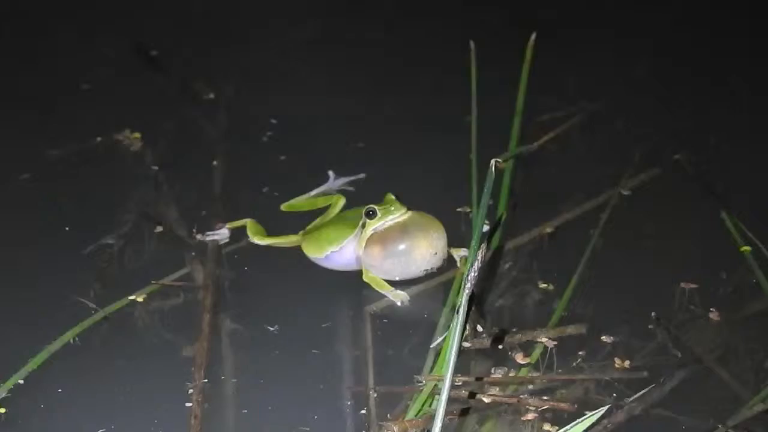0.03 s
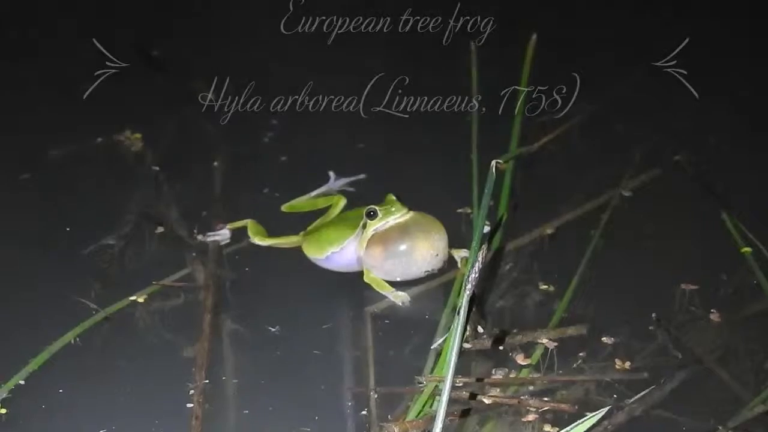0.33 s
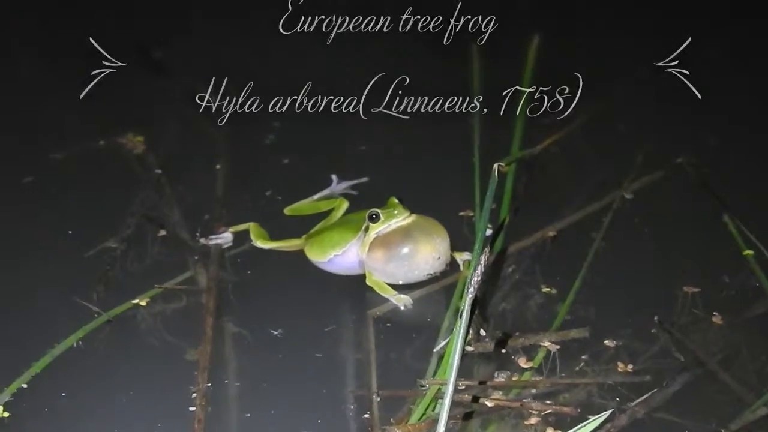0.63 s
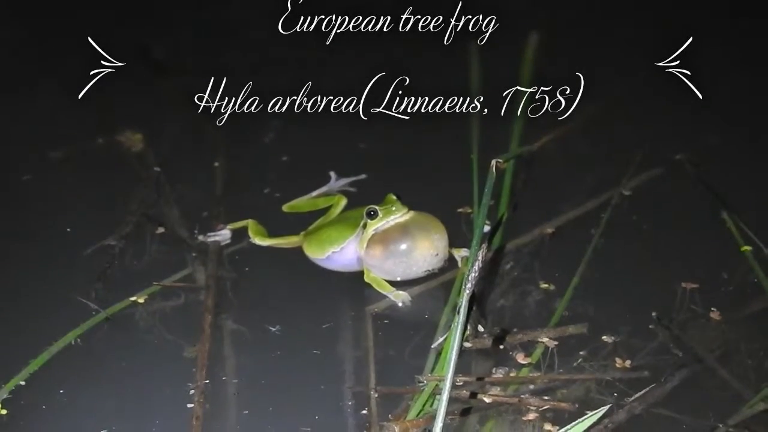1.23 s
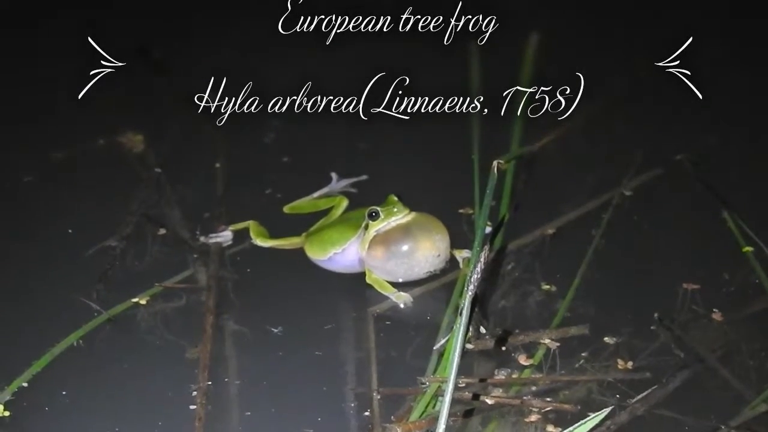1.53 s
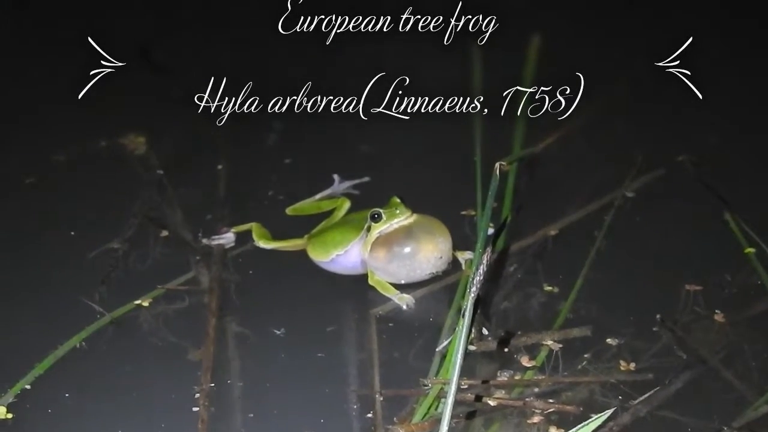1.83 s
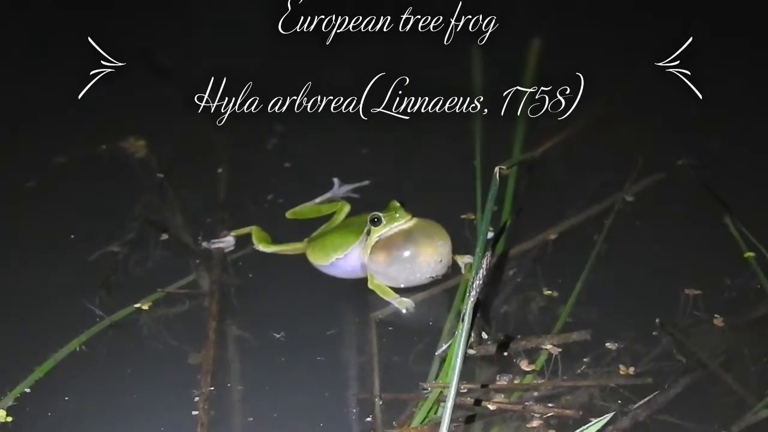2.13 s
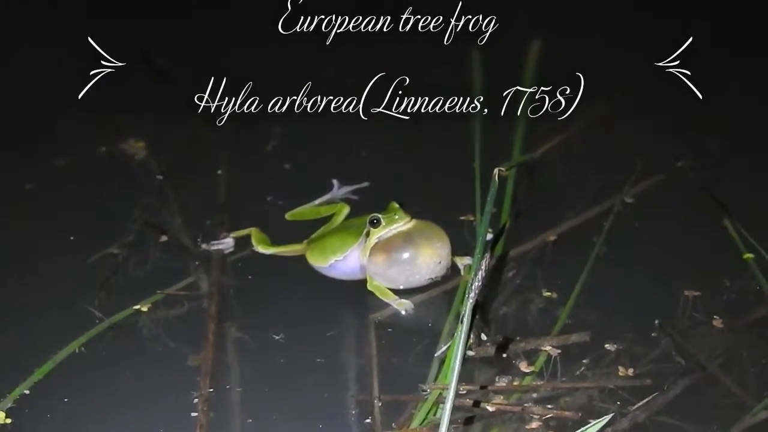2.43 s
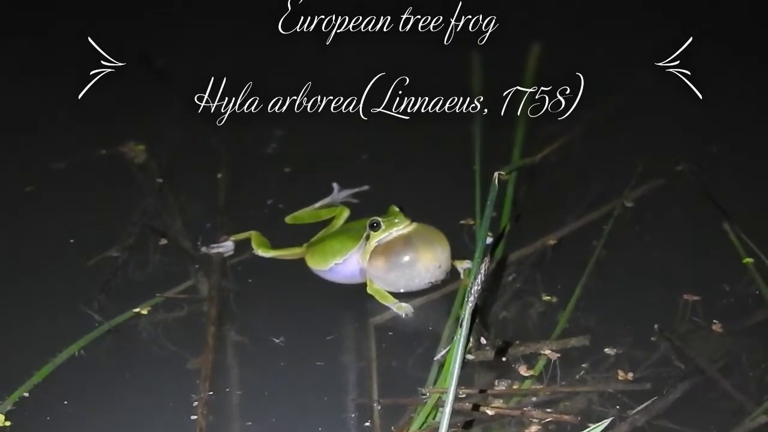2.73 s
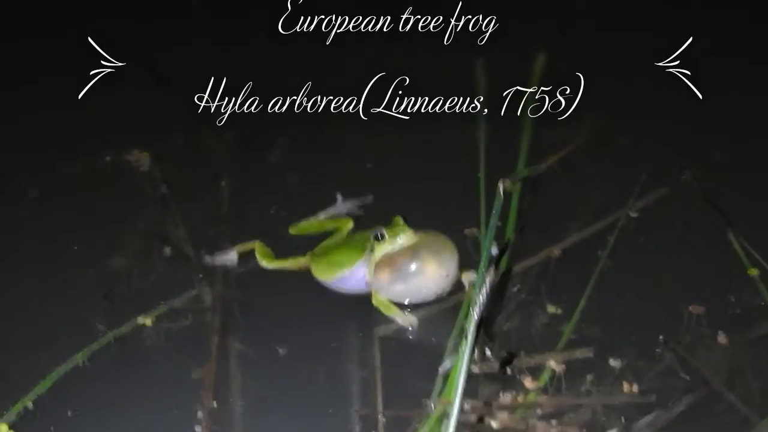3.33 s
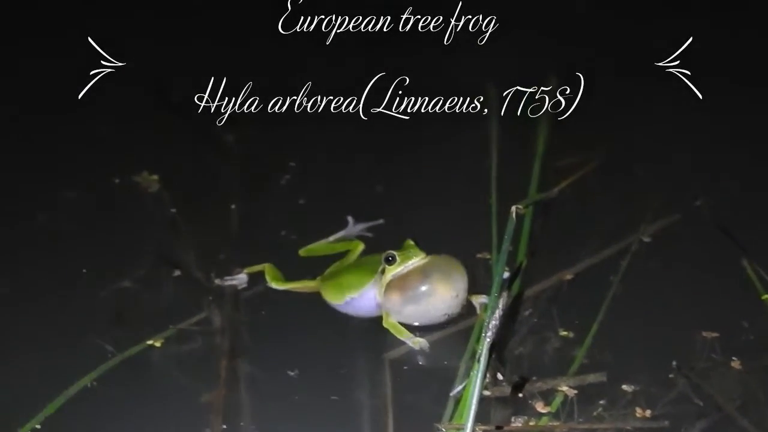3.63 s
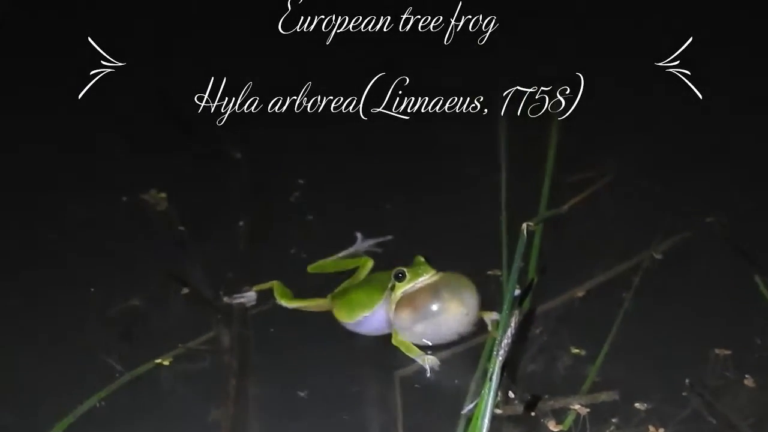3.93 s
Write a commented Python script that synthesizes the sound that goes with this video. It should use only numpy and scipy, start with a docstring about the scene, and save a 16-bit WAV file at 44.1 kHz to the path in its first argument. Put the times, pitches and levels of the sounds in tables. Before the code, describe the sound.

Tree frogs croak rapidly at a night pond, a close one joining near the end.

```python
"""Tree frogs at a night pond. Each croak is a quick run of pulses ringing the vocal sac, rising in pitch.
Neighbours on the left take turns with swelling croaks over a far chorus; near the end a close frog joins,
loud enough to crackle the microphone. Reeds and banks scatter the calls. Soft hoots and thin chirps come
from far away, and two soft bumps and a faint drone sound in the night air."""
import sys
import numpy as np
from scipy import signal
from scipy.fft import rfft, irfft
from scipy.io import wavfile
from scipy.ndimage import uniform_filter1d, minimum_filter1d

SR = 44100
rng = np.random.default_rng(int(sys.argv[2]) if len(sys.argv) > 2 else 0)


def pcm_store(signal):
    """Save signal as 16-bit PCM."""
    levels = np.round(np.clip(np.atleast_2d(signal), -1, 1) * 32767)
    wavfile.write(sys.argv[1], SR, levels.astype(np.int16).T)


N = 176400
T = np.arange(N) / SR

JITTER_S = .00015   # pulse timing, all frogs
# Pulse of the neighbours and the far chorus.
PULSE_S = (.0017, .0008, .0013)   # attack, hold, decay
RASP_DB = -26.5
# Its rasp spectrum. Each row: frequency in Hz, relative level in dB.
RASP_SPECTRUM = [(950, -3.5), (1600, 3.5), (3000, -3.5), (4500, -14), (7000, -29), (8500, -34),
                 (16000, -35)]


def from_db(db):
    """Decibels to gain."""
    return 10 ** (np.asarray(db) / 20)


def add(out, s, x):
    """Mix x into out from time s on."""
    i = int(round(s * SR))
    a, b = max(i, 0), min(i + x.shape[-1], N)
    if b > a:
        out[..., a:b] += x[..., a - i:b - i]


def at_hz(points, hz):
    """Read a table on a log-frequency axis."""
    knots_hz, values = np.transpose(points)
    return np.interp(np.log(hz + 1), np.log(knots_hz), values)


def ramp(x):
    """Smooth step from 0 to 1."""
    return np.sin(np.pi / 2 * np.clip(x, 0, 1)) ** 2


def noise(spectrum):
    """Stereo noise of rms 1, coloured by rows of Hz, dB."""
    # Stereo likeness. Each row: frequency in Hz, left-right correlation.
    likeness = [(30, 0.55), (400, 0.63), (2500, 0.21), (12000, 0.26)]
    hz = np.arange(N // 2 + 1) * SR / N
    mid, side = rfft(rng.standard_normal((2, N))) * from_db(at_hz(spectrum, hz))
    alike = at_hz(likeness, hz)
    x = irfft(np.sqrt(1 + alike) * mid + np.sqrt(1 - alike) * side * [[1], [-1]], N)
    return x / x.std()


def tones(rows, attack_s, release_s, sag_hz_per_s=0, waver=0):
    """Soft, nearly pure notes; optional pitch sag and level waver."""
    out = np.zeros(N)
    for s, length_s, hz, db in rows:
        t = T[:int(length_s * SR)]
        unsteady = 1 + waver * np.interp(t, np.linspace(0, 1, 40), rng.standard_normal(40))
        envelope = ramp(t / attack_s) * ramp((length_s - t) / release_s) * unsteady
        add(out, s, from_db(db) * envelope * np.sin(2 * np.pi * (hz - sag_hz_per_s * t / 2) * t))
    return out


def night_air(level_db=-45.5):
    """Air and the farthest calls, blurred into steady noise."""
    # Each row: frequency in Hz, relative level in dB.
    air_spectrum = [(25, -28.5), (65, -0.5), (180, 2.5), (300, -17.5), (420, -3.5), (620, -8.5), (950, 8.5),
                    (1600, -4.5), (2200, 0), (3000, -8), (4500, -9), (6500, -17.5), (9000, -22.5),
                    (16000, -35.5)]
    return from_db(level_db) * noise(air_spectrum)


def bumps_and_drone():
    """Two soft low bumps and a faint drone."""
    # Each row: start in seconds, length in seconds, pitch in Hz, gain in dB.
    low_notes = [(1.75, 0.055, 202, -36), (2.06, 0.59, 152.3, -50.5), (2.26, 0.059, 227, -37.5)]
    return tones(low_notes, attack_s=.06, release_s=.042, waver=.1)


def thin_chirps(period_s=.055, length_s=.038):
    """Something small, far away: runs of falling chirps."""
    # Each row: start in seconds, chirp count, starting pitch in Hz, level in dB.
    runs = [(0.378, 3, 4600, -50.5), (.81, 3, 4230, -52.5), (0.951, 4, 4520, -50), (1.613, 4, 4630, -49.5),
            (2.03, 4, 4310, -57), (2.226, 4, 4600, -49), (2.569, 6, 4320, -59), (2.954, 3, 4630, -48)]
    chirps = [(s + period_s * k, length_s, hz, db) for s, count, hz, db in runs for k in range(count)]
    return tones(chirps, attack_s=.0071, release_s=.01, sag_hz_per_s=10000)


def distant_hoots():
    """Soft, wavering hoots sound in the distance."""
    # Each row: start in seconds, length in seconds, starting pitch in Hz, level in dB.
    hoots = [(.63, 0.3, 507, -36), (.72, 0.44, 494, -50), (1.28, 0.29, 490, -47), (1.3, 0.32, 464, -52),
             (2.04, 0.3, 465, -45), (2.33, 0.19, 494, -42.5), (2.36, 0.2, 466.4, -42.5),
             (2.58, 0.13, 473, -38.5), (2.9, 0.16, 455, -45.5), (3.1, 0.13, 446, -45.5),
             (3.43, 0.23, 501, -37)]
    return tones(hoots, attack_s=.039, release_s=.094, sag_hz_per_s=50, waver=.36)


def with_banks(x, scatter_db, t60_s=.14, onset_s=.0059, width=.29):
    """x plus diffuse scatter from reeds and banks, a little different at each ear."""
    t = T[:SR // 2]
    mid, side = rng.standard_normal((2, len(t))) * from_db(-60 * t / t60_s) * ramp(t / onset_s)
    tail = mid + width * side * [[1], [-1]]
    tail /= np.sqrt((tail ** 2).sum(axis=1, keepdims=True))
    return x + from_db(scatter_db) * signal.fftconvolve(x, tail, axes=1)[:, :N]


def vocal_sac(pulses, shape_s, partials, rasp_spectrum, rasp_db):
    """Each pulse rings the sac and lets out a little rasp; the small sac radiates no lows."""
    full_effort_hz, low_edge_hz = 2250, 857
    left_lead_s, weak_pan_share = .00004, .63
    attack_s, hold_s, decay_s = shape_s
    t = T[:SR // 60]
    envelope = ramp(t / attack_s) * np.exp(-np.maximum(t - attack_s - hold_s, 0) / decay_s)
    ratio, partial_db = np.transpose(partials)
    weak = partial_db < partial_db.max()
    low = ratio < ratio.max() / 3
    ring, flow = np.zeros((2, N)), np.zeros(N)
    for s, db, hz, pan_db in pulses:
        left = from_db(db + partial_db + 2 * rng.standard_normal(len(weak)) * weak)
        right = left * from_db(-pan_db * np.where(weak, weak_pan_share, 1))
        partial_hz = hz * ratio * np.where(low, hz / full_effort_hz, 1)   # low partials glide further
        omega = 2 * np.pi * partial_hz[:, None]
        right_t = t - left_lead_s * (pan_db > 2)
        add(ring, s, envelope * np.array([left @ np.sin(omega * t), right @ np.sin(omega * right_t)]))
        add(flow, s, from_db(db) * envelope)
    rasp = from_db(rasp_db) * flow * noise(rasp_spectrum)
    radiation = signal.butter(8, low_edge_hz, "high", fs=SR, output="sos")
    return signal.sosfilt(radiation, ring + rasp)


def hiss_sweep(ends, hiss_db):
    """A thin band of hiss sweeps upward with each croak and levels off; ends are rows of s, dB."""
    from_hz, to_hz, width_hz = 3600, 6820, 1400
    length_s, overhang_s = .054, .012
    progress = T[:int(length_s * SR)] / length_s
    hz = to_hz - (to_hz - from_hz) * (1 - progress) ** 2.1
    sweep = np.sqrt(np.sin(np.pi * progress)) * np.cos(2 * np.pi * np.cumsum(hz) / SR)
    white = noise([(1, 0), (SR / 2, 0)])
    rough = signal.sosfilt(signal.butter(2, width_hz / 2, fs=SR, output="sos"), white)
    out = np.zeros((2, N))
    for s, db in ends:
        add(out, s + overhang_s - length_s, from_db(db + hiss_db) * sweep)
    return out * rough / rough.std()


def croak(end_s, db, hz, pan_db, count=9):
    """Pulse rows that swell and rise in pitch until end_s; one weak pulse more as the sac relaxes."""
    gap_s, swell_db, glide_share, after_pulse_db = .0069, 14, .038, -18
    k = np.arange(count) - 1   # counts back from the last strong pulse; -1 is the after-pulse
    early = np.maximum(k, 0) / k[-1]
    jitter = rng.standard_normal((3, count))
    times_s = end_s - PULSE_S[0] - gap_s * k + JITTER_S * jitter[0]
    levels_db = db - swell_db * early ** 2.64 + after_pulse_db * (k < 0) + .5 * jitter[1]
    pitches_hz = hz * (1 - glide_share * early + .0024 * jitter[2])
    return np.transpose([times_s, levels_db, pitches_hz, np.full(count, pan_db)])


def far_chorus(croaks_per_s=22, pitch_hz=2230, spread_hz=67, pan_db=8):
    """Many frogs across the pond, scattered in time, level, pitch and direction."""
    # Croak level over time. Each row: time in seconds, level in dB.
    level_curve = [(0, -27), (.6, -20.5), (1.5, -25), (1.8, -29.5), (2.4, -31.5), (3.2, -27.5), (4, -26)]
    # Sac partials. Each row: multiple of the pitch, level in dB.
    partials = [(0.422, -19), (.5, -17.5), (.64, -16.5), (1.001, 4.5), (1.3, -20.5), (1.55, -25.5)]
    pulses = []
    for s in np.arange(0, N / SR + .1, 1 / croaks_per_s):
        late_s, off_db, off_hz, off_pan_db = rng.standard_normal(4) * [.015, 2, spread_hz, 2]
        db = np.interp(s, *np.transpose(level_curve))
        pulses.extend(croak(s + late_s, db + off_db, pitch_hz + off_hz, pan_db + off_pan_db))
    return with_banks(vocal_sac(pulses, PULSE_S, partials, RASP_SPECTRUM, RASP_DB), scatter_db=-5.5)


def neighbours():
    """A few frogs take turns a little way off to the left."""
    # Each row: last strong pulse in seconds, level in dB, final pitch in Hz.
    croaks = [ (.248, -3.5, 2254), (0.318, -20.5, 2240), (.364, -5, 2250), (.447, -15, 2230),
              (0.486, -6, 2217), (.618, -6, 2250), (.654, -10.5, 2250), (0.743, -5.5, 2210),
              (.781, -16, 2280), (.850, -20, 2180), (.872, -6.5, 2225), (.925, -11.5, 2214),
              (1.005, -5.5, 2230), (1.050, -27.5, 2110), (1.072, -9.5, 2267), (1.136, -5, 2230),
              (1.205, -17.5, 2150), (1.259, -5.5, 2253), (1.342, -14.5, 2155), (1.384, -5.5, 2227),
              (1.513, -4, 2228), (1.624, -15, 2164), (1.658, -5, 2215), (1.715, -37, 2840),
              (1.776, -12, 2175), (1.894, -31, 2780), (1.917, -17, 2180), (1.954, -13, 2215),
              (2.022, -11, 2250), (2.097, -11.5, 2230), (2.191, -7.5, 2310), (2.284, -31, 2700),
              (2.295, -16.5, 2150), (2.425, -16.5, 2182), (2.530, -7, 2304), (2.553, -20, 2135),
              (2.668, -7, 2310), (2.690, -17, 2200), (2.795, -6.5, 2294), (2.830, -19, 2130),
              (2.925, -6.5, 2314), (3.008, -6.5, 2215), (3.059, -7, 2286), (3.095, -18, 2180),
              (3.195, -7, 2320), (3.228, -20.5, 2110), (3.321, -7, 2285), (3.457, -7, 2277),
              (3.520, -19.5, 2100), (3.585, -7, 2296), (3.717, -7.5, 2333), (3.924, -3, 2220)]
    # Direction. Each row: time in seconds, left minus right in dB.
    pan_curve = [(1, 10), (2.2, 14)]
    # Sac partials. Each row: multiple of the pitch, level in dB.
    partials = [(0.434, -23), (0.51, -27.5), (0.999, 0), (1.55, -31), (1.999, -37)]
    pulses = np.vstack([croak(s, db, hz, np.interp(s, *np.transpose(pan_curve))) for s, db, hz in croaks])
    voice = vocal_sac(pulses, PULSE_S, partials, RASP_SPECTRUM, RASP_DB)
    hiss = hiss_sweep([(s, db) for s, db, _ in croaks], hiss_db=-46)
    return with_banks(voice + hiss, scatter_db=-14)


def close_frog():
    """Loud, hard pulses scoop up in pitch, then crowd; early ones crackle with microphone overload."""
    # Each row: first pulse in seconds, level in dB, pitch approached in Hz, pulse count.
    croaks = [(3.37, -2, 2282, 9), (3.6278, -1.5, 2280, 9), (3.7814, -1, 2292, 9), (3.9260, -1.5, 2340, 8)]
    # Sac partials. Each row: multiple of the pitch, level in dB.
    partials = [(0.453, -12), (0.536, -12.5), (1.001, -1.5), (1.52, -22.5), (2, -34.5)]
    # Each row: frequency in Hz, relative level in dB.
    rasp_spectrum = [(900, 18.5), (1600, -26), (3000, -19), (4500, -12), (7000, -0.5), (8500, -24.5),
                     (16000, -21.5)]
    shape_s = (.00037, .0012, .0024)   # attack, hold, decay
    gap_s, hurry_share, scoop_share, scoop_pulses = .0077, .27, .1, 3
    first_db, fade_db, pan_db = -2.5, -6.5, .5
    crackle_db, crackle_step_db, crackle_decay_s = -19, -5, .0005
    burst = np.exp(-T[:SR // 100] / crackle_decay_s)
    pulses, ends, crackle_envelope = [], [], np.zeros(N)
    for start_s, db, hz, count in croaks:
        k = np.arange(count)
        late = k / k[-1]
        gaps_s = gap_s * (1 - hurry_share * late ** 3) + JITTER_S * rng.standard_normal(count)
        times_s = start_s + np.cumsum(gaps_s) - gaps_s[0]
        levels_db = db + first_db * (k == 0) + fade_db * late ** 3
        pitches_hz = hz * (1 - scoop_share * np.exp(-k / scoop_pulses))
        pulses += [(*row, pan_db) for row in zip(times_s, levels_db, pitches_hz)]
        ends.append((times_s[-1], db))
        for i, s in enumerate(times_s[1:]):   # overload as noise bursts, from the second pulse on
            add(crackle_envelope, s + shape_s[0], from_db(crackle_db + crackle_step_db * i) * burst)
    voice = vocal_sac(pulses, shape_s, partials, rasp_spectrum, rasp_db=-18)
    crackle = crackle_envelope * noise([(400, -2), (3000, -1.5), (16000, -18.5)])
    return with_banks(voice + crackle + hiss_sweep(ends, hiss_db=-31.5), scatter_db=-10.5)


def scene():
    """The whole pond."""
    frogs = close_frog() + neighbours() + far_chorus()
    return frogs + distant_hoots() + bumps_and_drone() + thin_chirps() + night_air()


def record(dry):
    """Quick fade-in, peak limiter, steep treble cut."""
    start_s, fade_s, limiter_s, stopband_hz = .119, .034, .002, 16400
    x = dry * ramp((T - start_s) / fade_s)
    window = int(limiter_s * SR)
    needed_gain = 1 / np.maximum(abs(x).max(axis=0), 1)
    gain = uniform_filter1d(minimum_filter1d(needed_gain, window), window)
    return signal.sosfiltfilt(signal.cheby2(16, 50, stopband_hz, fs=SR, output="sos"), gain * x)


dry = scene()
out = record(dry)
pcm_store(out)
```